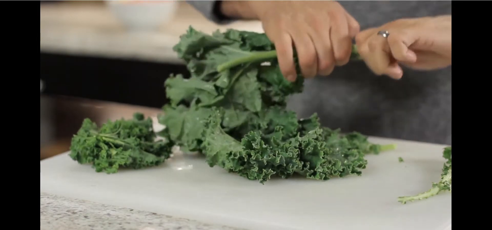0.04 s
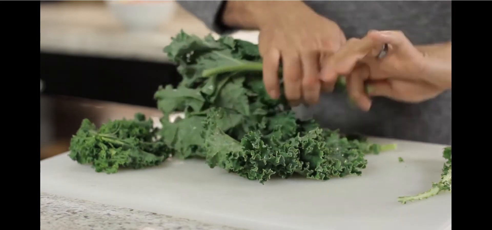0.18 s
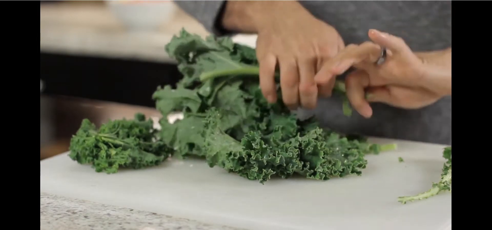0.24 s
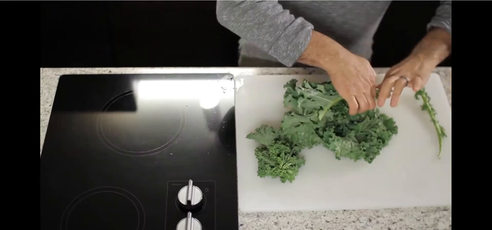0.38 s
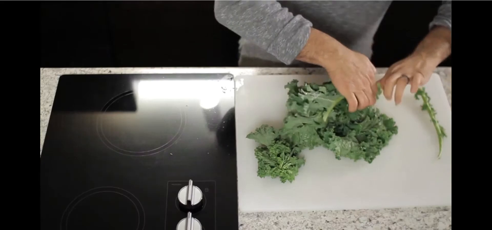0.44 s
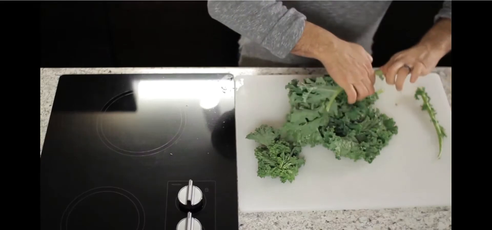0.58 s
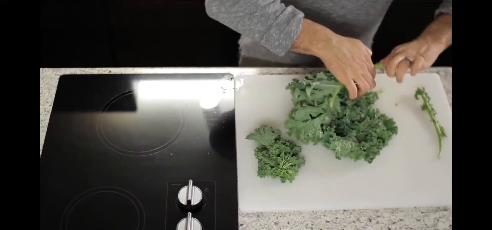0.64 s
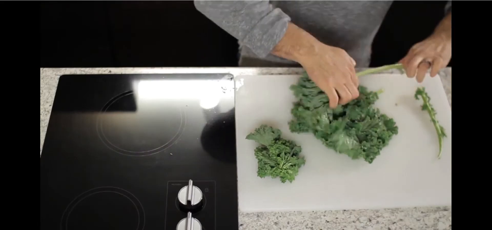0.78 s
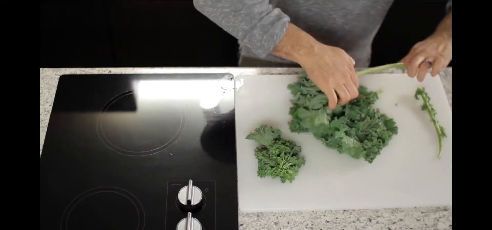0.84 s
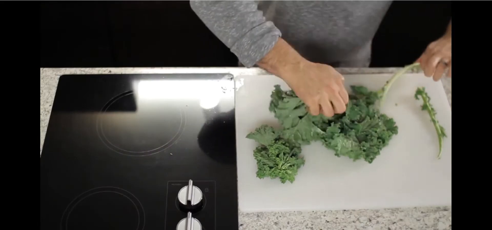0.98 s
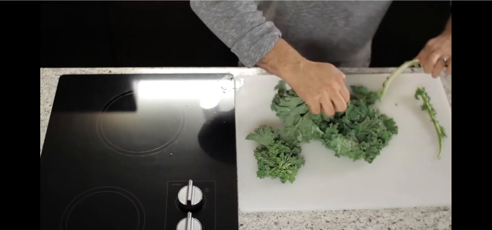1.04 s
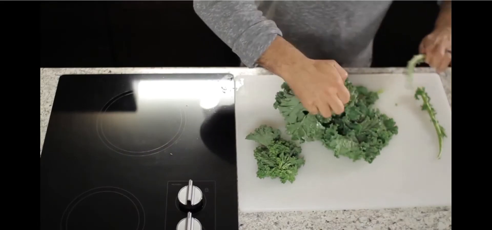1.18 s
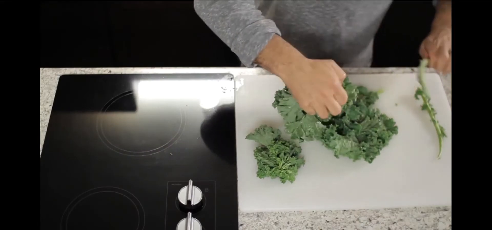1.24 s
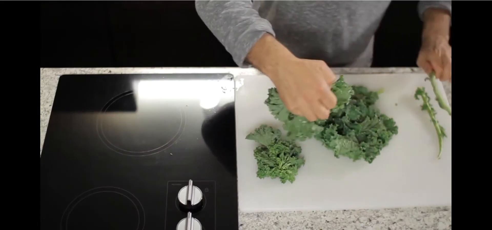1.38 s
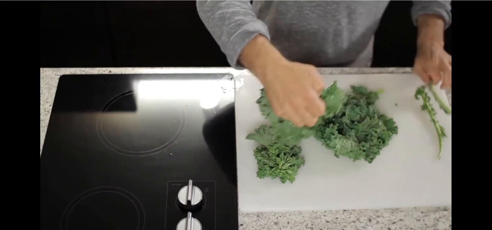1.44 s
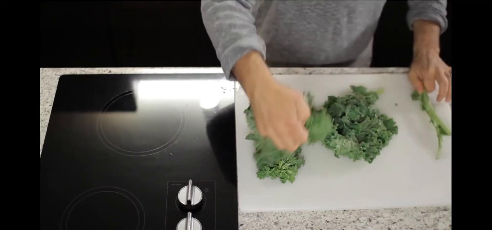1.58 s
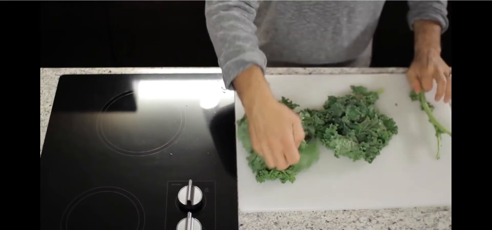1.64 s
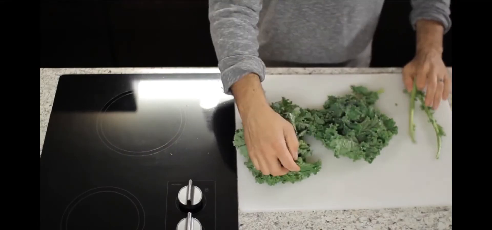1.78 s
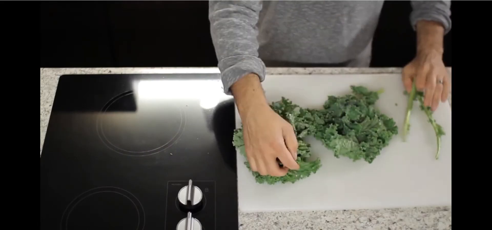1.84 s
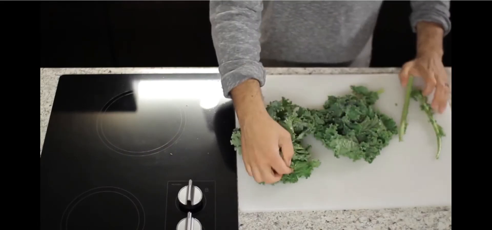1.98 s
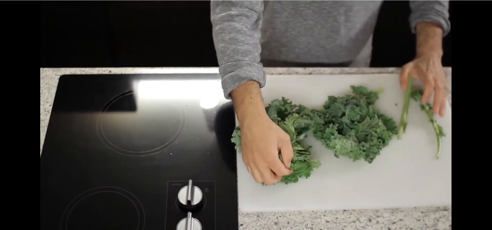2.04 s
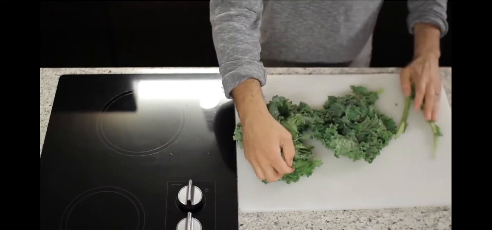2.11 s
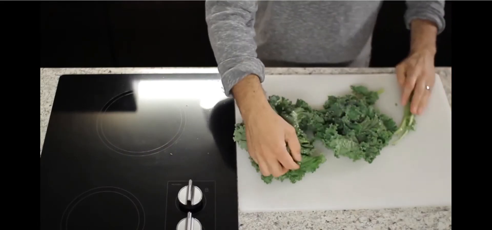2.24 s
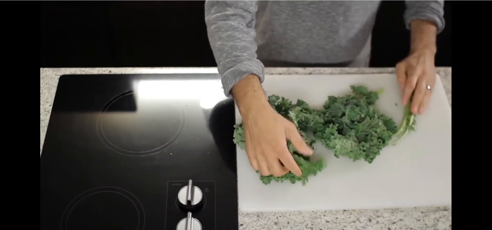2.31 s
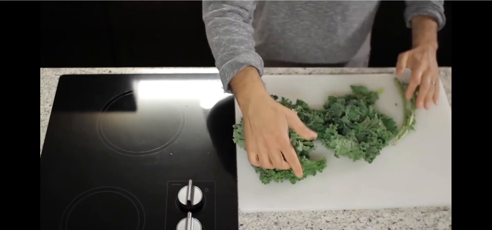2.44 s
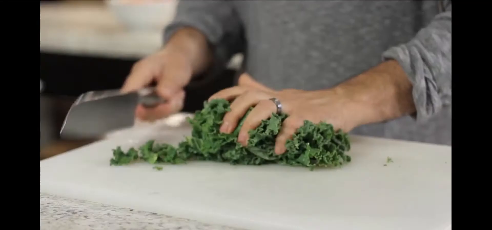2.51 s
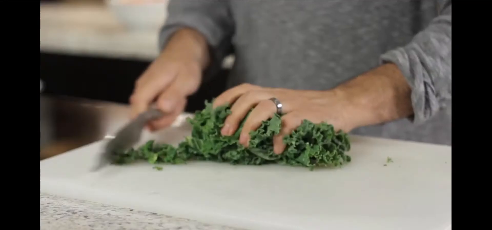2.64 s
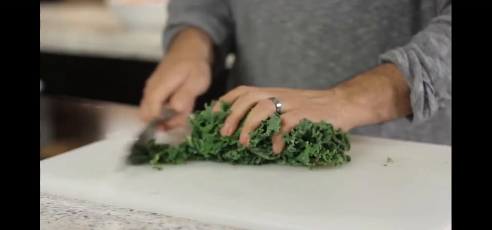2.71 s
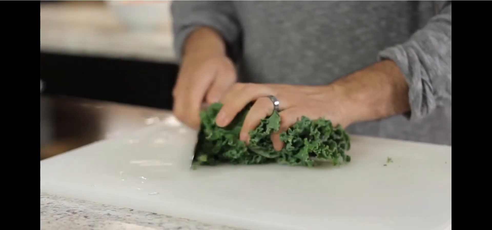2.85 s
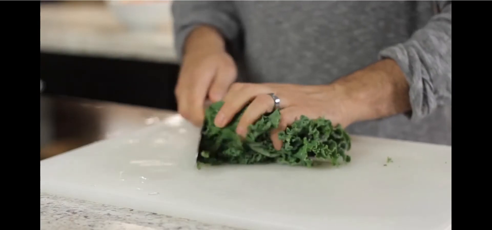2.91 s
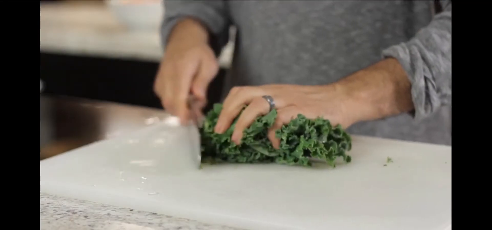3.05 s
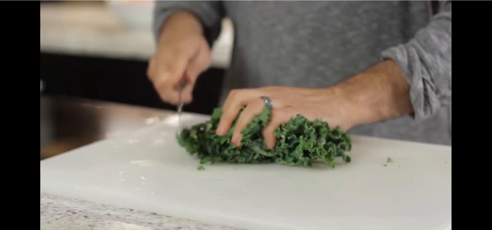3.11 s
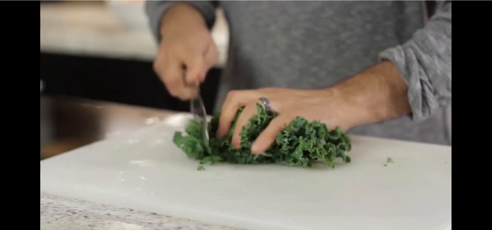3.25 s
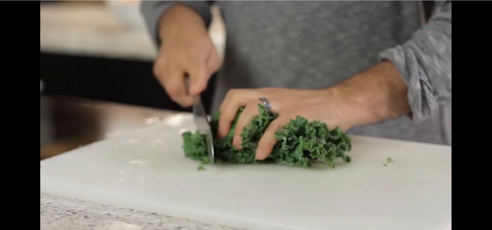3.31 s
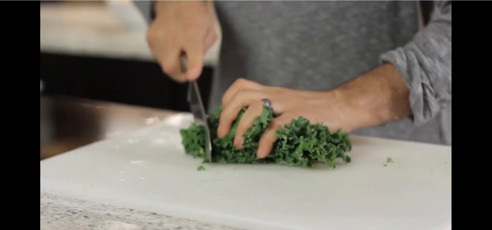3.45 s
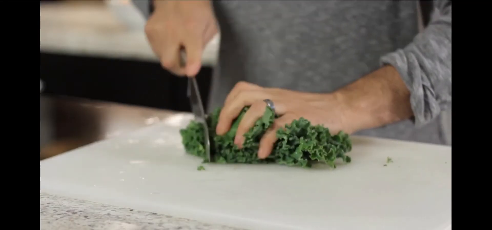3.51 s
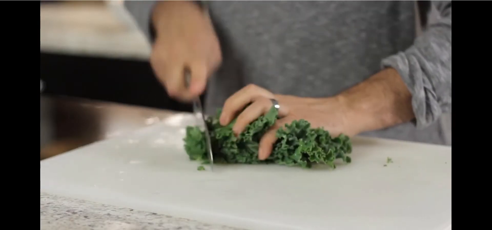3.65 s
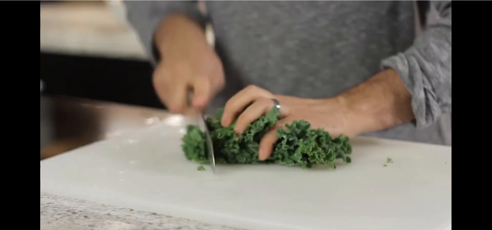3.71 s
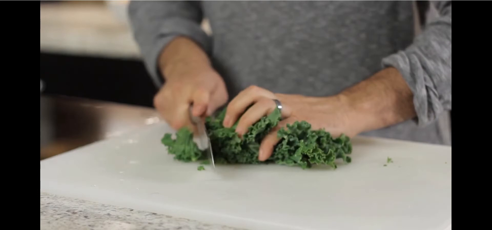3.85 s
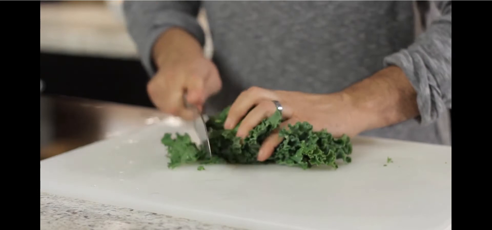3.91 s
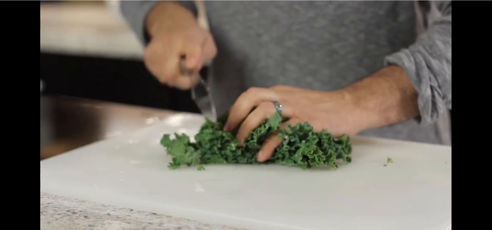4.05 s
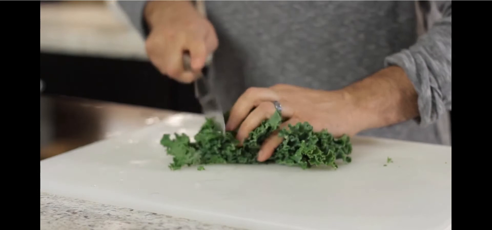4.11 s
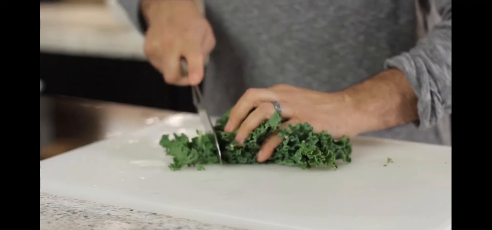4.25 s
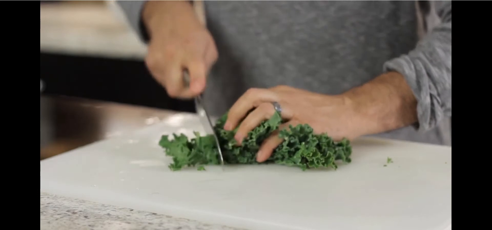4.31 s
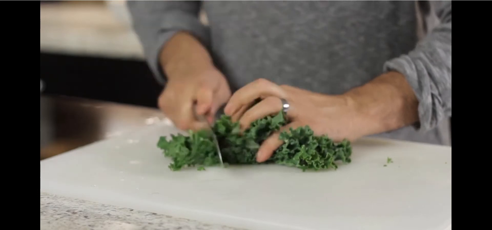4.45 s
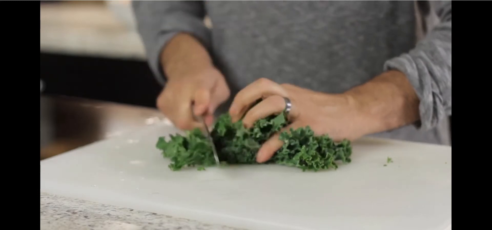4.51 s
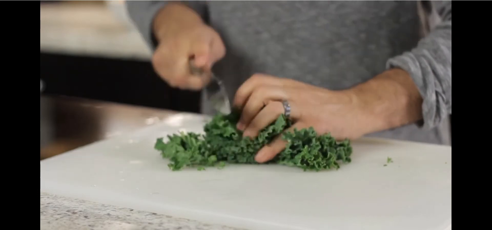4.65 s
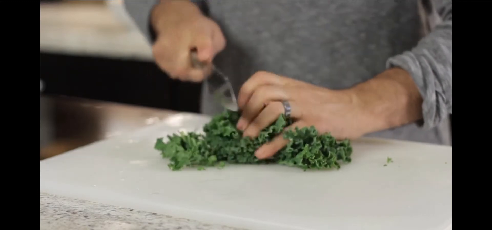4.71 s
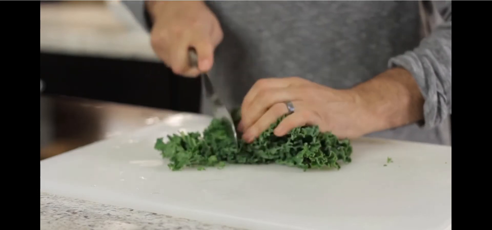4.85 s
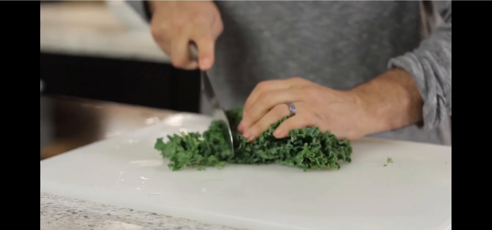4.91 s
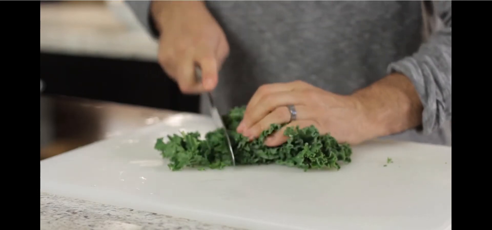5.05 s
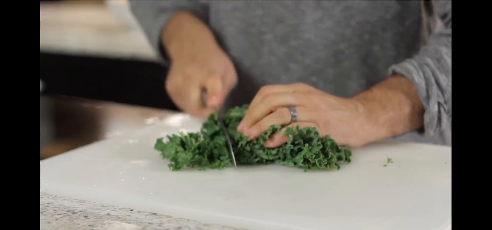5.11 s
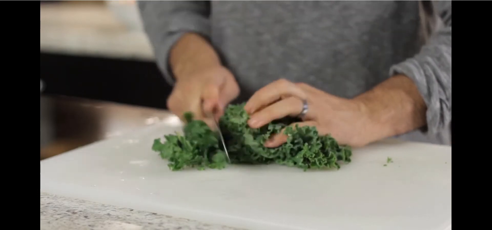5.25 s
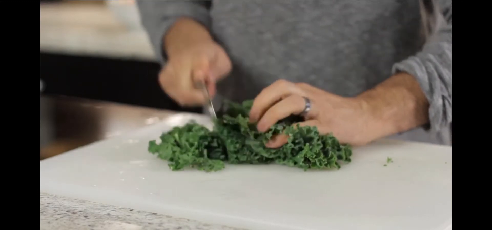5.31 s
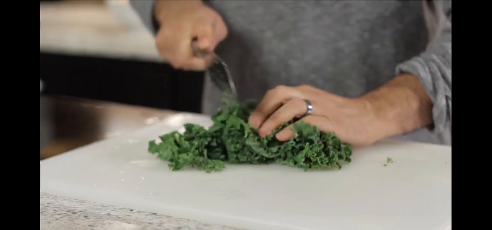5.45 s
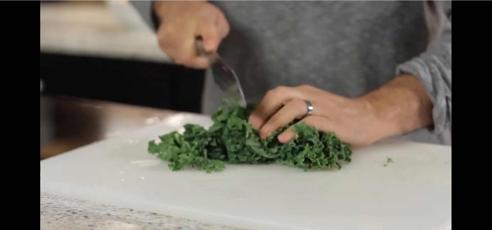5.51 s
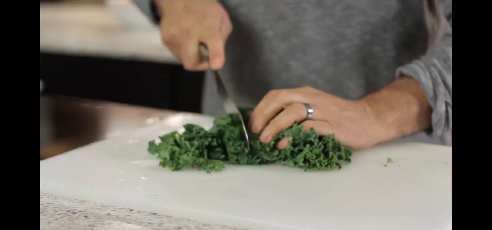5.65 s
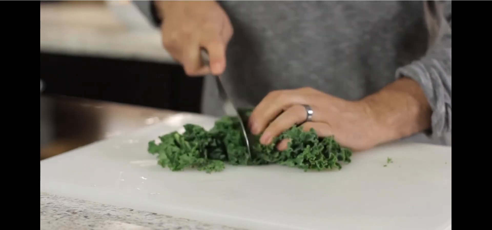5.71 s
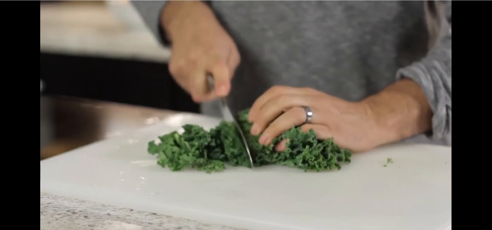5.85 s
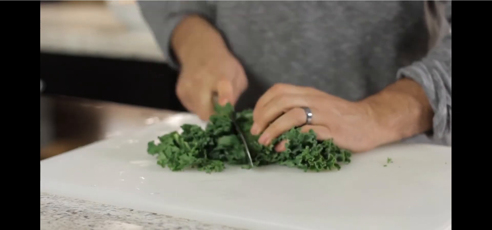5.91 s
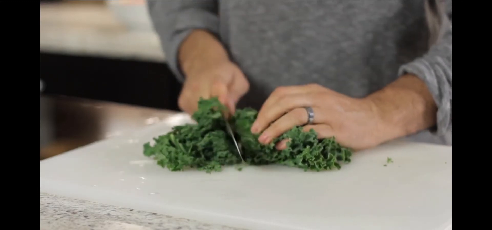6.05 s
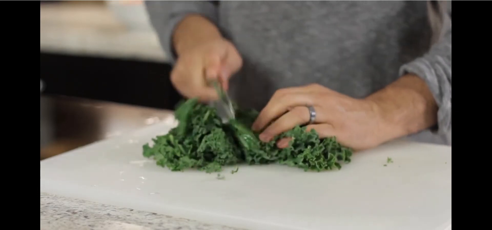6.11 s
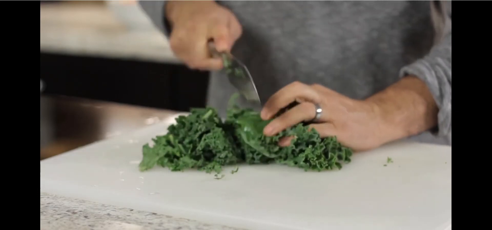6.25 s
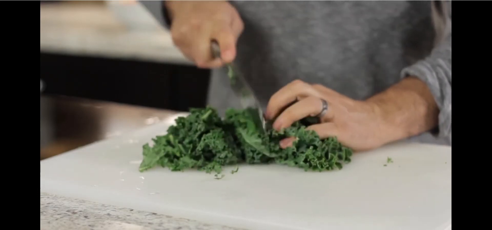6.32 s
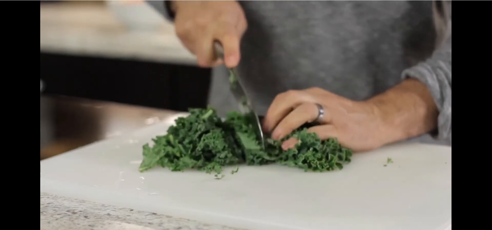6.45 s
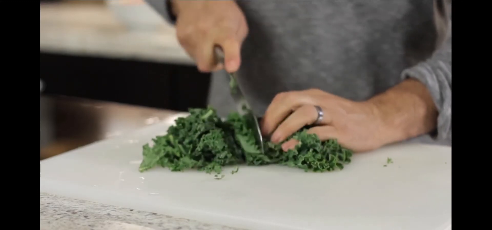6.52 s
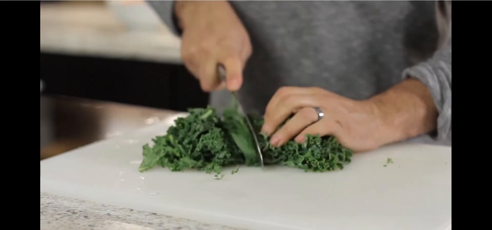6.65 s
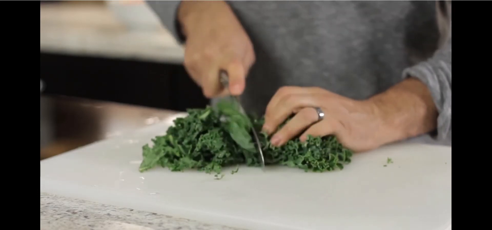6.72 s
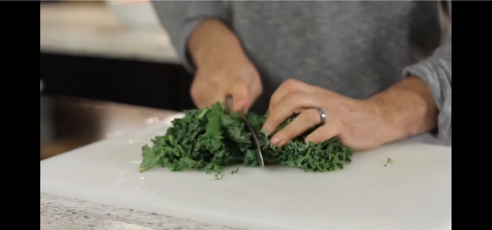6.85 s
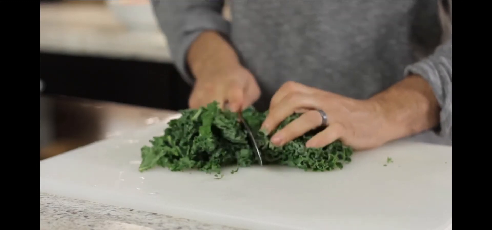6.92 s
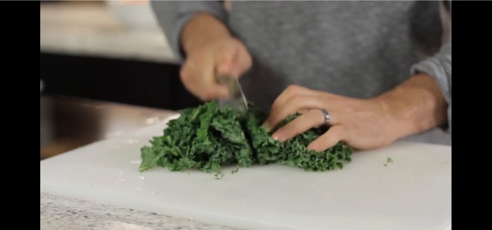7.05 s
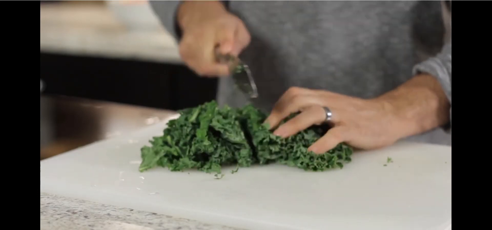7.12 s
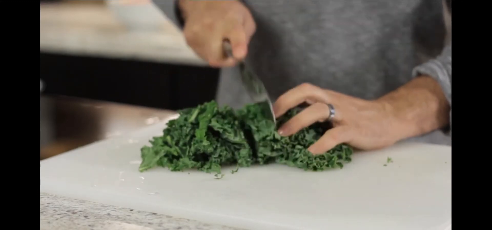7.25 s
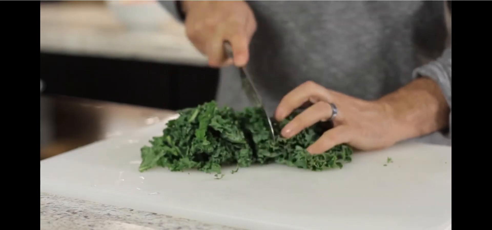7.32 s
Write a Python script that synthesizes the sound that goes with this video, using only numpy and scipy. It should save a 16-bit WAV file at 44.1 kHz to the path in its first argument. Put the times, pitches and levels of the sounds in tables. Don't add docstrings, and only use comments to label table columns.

```python
import sys
import numpy as np
from scipy import signal
from scipy.fft import irfft
from scipy.io import wavfile
from scipy.ndimage import uniform_filter1d

SR = 44100
rng = np.random.default_rng(int(sys.argv[2]) if len(sys.argv) > 2 else 0)


def inscribe(sig):
    pcm = np.round(np.clip(np.atleast_2d(sig).T, -1, 1) * 32767)
    wavfile.write(sys.argv[1], SR, pcm.astype(np.int16))


def gain_from_db(level_db):
    decades = np.asarray(level_db, float) / 20
    return 10 ** decades


N = 325458
T = np.arange(N) / SR

# hz, level_db_per_hz
LEAF_SPECTRUM = [(350, -4), (600, -17), (1180, -20), (2150, -9.5), (2470, -6.5), (3160, -4), (3680, 0),
                 (4780, -5), (8270, -10), (15100, -20), (16000, -24)]
# time_s, level_db, treble_db
HAND_GRIP = [(0, -57, 2), (1.3, -56, 1), (1.93, -54, 5), (2.6, -53, 0), (2.95, -42, -10), (3.3, -47, -6),
             (3.55, -39.5, -8), (4.04, -38, -9), (4.18, -50, -9), (4.35, -44, -5), (4.75, -42, -8),
             (5.33, -39, -12), (5.58, -48, -10), (6.1, -41, -8), (6.35, -37.5, -9), (7.0, -41, -9),
             (7.15, -49, -2), (7.38, -50, -2)]
# peak_s, level_db, rise_s_per_20db, fall_s_per_20db, treble_db
STRIPPING_STROKES = [(0.0, -41, .1, .07, 0), (0.115, -41, .06, .04, -10), (0.225, -41.5, .06, .08, -8),
                     (0.36, -34.5, .07, .07, -11.5), (0.51, -38, .02, .02, -6), (0.612, -31, .02, .13, 4),
                     (0.766, -33, .03, .03, 2), (0.784, -23, .008, .1, 1), (0.824, -16, .06, .1, 3),
                     (0.872, -19, .12, .05, 3), (0.96, -44, .1, .2, 7), (1.07, -36, .2, .23, -10),
                     (1.65, -48, .1, .1, 0), (1.81, -32.5, .25, .14, -9), (2.14, -38.5, .2, .4, -7),
                     (2.4, -40, .07, .4, -12), (2.63, -42, .15, .03, -5)]
# peak_s, level_db, rise_s_per_20db, fall_s_per_20db, treble_db
GATHERING_SWEEPS = [
    (2.649, -15, .004, .08, -26),
    (2.71, -27, .1, .4, -18),
    (2.94, -37, .3, .25, -9),
]
# peak_s, level_db, rise_s_per_20db, fall_s_per_20db, treble_db
CUTTING_STROKES = [(3.23, -32, .4, .07, -3), (3.36, -32, .065, .3, -2.5), (3.46, -27, .06, .08, -.5),
                   (3.76, -29.5, .17, .13, -2), (4.225, -27, .025, .07, 0), (4.48, -27.5, .2, .08, 3),
                   (4.68, -33, .15, .2, -5), (4.83, -33, .09, .04, -1), (4.92, -28, .08, .085, .5),
                   (5.0, -35, .02, .2, -3), (5.095, -18, .05, .12, -3), (5.19, -22, .25, .13, -3),
                   (5.45, -36, .2, .2, -6), (5.64, -25, .025, .04, -3), (5.783, -22, .012, .2, -6.5),
                   (5.755, -31, .03, .06, -6), (5.85, -19, .11, .17, -3), (5.98, -21.5, .4, .09, -7.5),
                   (6.425, -27, .04, .08, -4), (6.53, -30, .045, .25, 4), (6.63, -27, .06, .1, -4),
                   (6.725, -17.5, .15, .12, -5), (6.83, -23.5, .15, .15, -7), (6.905, -24, .15, .065, -1),
                   (7.25, -37.5, .16, .12, -8), (7.35, -28, .025, .06, -3)]
# start_s, peak_db, treble_db
STEM_TEARS = [(0.1216, -26, -3), (0.222, -25, -8), (0.4163, -25, -8), (0.4362, -21, 0), (0.5803, -12, 2.5),
              (0.602, -6, -4), (0.6469, -6, -.5), (0.7504, -14, 5), (0.7808, 1, -2), (0.9505, -24, 14),
              (0.9767, -17, 4), (0.985, -22, 10), (1.1385, -12, -2), (1.5327, -26, -10), (1.657, -20, 15),
              (2.6478, 2, -22), (2.7496, -7, -17), (2.8803, -6, -17)]
# start_s, peak_db, treble_db
RIB_BREAKS = [(3.048, -13, 0), (3.3484, -5, -2), (3.4558, 0, -6), (3.7284, -13, -5), (4.0363, -4, -6),
              (4.2215, -3, -3), (4.6185, -1, -.5), (4.797, -6, -2), (4.8945, -7, -4), (4.9064, -1, -2),
              (4.9452, -4, -2), (5.001, -5, 0), (5.0612, -9, -14), (5.087, -3, -10), (5.6365, 1, 0),
              (5.641, -4, 0), (5.6445, -7, 0), (5.6775, -8, -.5), (5.7322, 1, -5), (5.754, -5, -10),
              (5.778, -7, -20), (5.8421, 3, -6.5), (5.9286, -1, -12), (6.1943, -5, -6), (6.2236, -14, -1),
              (6.3905, -13, -4.5), (6.42, -6.5, -3), (6.5282, 0, 1), (6.6456, -1, 0), (6.666, 0, -7),
              (6.8995, 1, 0), (7.3458, -8, -6)]
# start_s, peak_db
LEAF_CRACKS = [(3.069, -16), (3.6275, -16), (3.759, -12), (3.8672, -18), (4.232, -10), (4.49, -5),
               (4.8215, -12), (4.9164, -3), (5.168, -3), (5.1815, -1), (5.2055, -5), (5.623, -13),
               (5.7875, -3), (5.9405, -1), (5.962, -3), (5.9925, -2), (6.161, -18), (6.2957, -16),
               (6.5405, -7), (6.564, -6), (6.618, -8), (6.8272, -2), (6.873, 0), (6.909, -2), (7.2495, -17),
               (7.3768, -10),
               (0.6096, -9), (0.8111, -4), (0.8453, -2), (0.859, -1), (1.1425, -18), (3.3964, -14),
                  (3.4708, -9), (3.492, -11), (3.5661, -17), (3.6558, -17), (3.9339, -17), (4.4493, -10),
                  (4.4732, -6), (4.5003, -10), (4.6256, -11), (4.9105, -6), (4.9283, -7), (5.0722, -8),
                  (5.0807, -5), (5.091, -1), (5.0971, 0), (5.1252, -3), (5.1426, -3), (5.1469, -5),
                  (5.1577, -7), (5.1751, -4), (5.2161, -7), (5.7392, -10), (5.7612, -9), (5.8008, -6),
                  (5.8133, -6), (5.8265, -4), (5.8449, -2), (5.8736, -3), (5.9324, -4), (5.9449, -4),
                  (5.9498, -2), (5.9805, -4), (5.9868, -4), (6.0002, -5), (6.2105, -19), (6.5353, -9),
                  (6.579, -9), (6.6124, -11), (6.6346, -10), (6.68, -5), (6.7103, -4), (6.7164, -1),
                  (6.729, -2), (6.735, -3), (6.7851, -9), (6.803, -6), (6.8079, -7), (6.815, -8),
                  (6.8349, -5), (6.8438, -6), (6.8569, -6), (6.8797, -6), (6.9026, -6), (6.9155, -6)]
# start_s, peak_db, dent_pitch_hz, upper_modes_db
BOARD_KNOCKS = [(2.255, -38, 229, -20), (2.65, -2, 223, -14.5), (2.783, -22, 169, -7),
                (3.473, -16, 231, -17.5), (3.842, -25, 274, -8.5), (4.223, -38, 307, 1),
                (4.296, -20, 240, -13), (4.51, -27.5, 280, -15), (4.538, -27, 186, -20),
                (5.0995, -10, 236, -4), (5.147, -25, 199, 0), (5.786, -15.5, 244, -15),
                (5.859, -11.5, 223, -12), (6.649, -16.5, 240, -31), (6.685, -20, 250, -8),
                (6.7315, -7, 234, -1), (6.785, -24, 300, 0), (6.975, -34, 178, -18)]
# pitch_hz, level_db, t60_s
BOARD_MODES = [(144, -22, .12), (186, -2.5, 0.24), (231, 1, 0.13), (269, -6, 0.09), (337, 0.5, .08),
               (395, -5.5, 0.097), (472, -1.5, 0.05), (583, -20, 0.047), (820, -36, .05)]
# peak_s, level_db, rise_s_per_20db, fall_s_per_20db, pressed_pitch_hz
BOARD_PRESSES = [(0.85, -25, .12, .065, 315), (2.12, -46, .6, .7, 207), (2.67, -6, .015, .075, 232),
                 (2.8, -26, .1, .25, 188), (3.475, -24, .015, .11, 231), (3.7, -34, .05, .06, 300),
                 (3.76, -36, .07, .08, 470), (3.85, -28, .04, .13, 285), (4.23, -42, .05, .05, 283),
                 (4.31, -29, .02, .2, 262), (4.51, -30, .08, .06, 300), (4.56, -27.5, .06, .07, 192),
                 (5.1, -16, .05, .08, 260), (5.28, -28, .07, .1, 240), (5.79, -16, .02, .2, 227),
                 (5.88, -21, .1, .14, 195), (5.96, -26, .1, .1, 195), (6.1, -36, .06, .2, 186),
                 (6.39, -48, .15, .5, 273), (6.66, -15, .04, .11, 220), (6.75, -15, .08, .15, 205),
                 (7.38, -44, .2, .1, 239)]
# time_s, main_mode_db, other_modes_db, tip_modes_db
BLADE_SCRAPE = [
    [(2.67, -46, 2, 7), (2.71, -28, -1, 3), (2.779, -22, 3, 4), (2.79, -11.5, -7, 1), (2.855, -11, -9, -5),
     (2.868, -24, 4, -7), (2.884, -12.5, -5, -4), (2.916, -27, 0, 2), (2.97, -62, 0, 5)],
]
# pitch_hz, width_hz, level_db
BLADE_MODES = [(645, 45, -37), (1400, 29, -34), (2050, 30, -25), (2670, 30, -28), (3010, 30, -21),
               (3520, 40, -21), (3900, 28, 0), (4090, 25, -14), (4540, 26, -11), (4745, 45, -21),
               (5050, 85, -24), (5430, 34, -24), (6370, 45, -21), (7230, 54, -20), (7800, 28, -22),
               (8420, 38, -28), (8800, 44, -28), (9310, 94, -27), (9650, 27, -22), (10300, 56, -28),
               (11300, 35, -25), (11800, 110, -22), (12200, 29, -21), (12500, 31, -29), (12800, 29, -23),
               (13700, 28, -28)]
# start_s, pitch_hz, level_db, t60_s
EDGE_CRACK = (2.6494, 3350, -10, .025)
# hz, level_db_per_hz
KITCHEN_SPECTRUM = [(15, -53), (25, -31), (53, -23), (145, 1.5), (195, -2), (354, -3.5), (754, -21),
                    (1040, -31.5), (2350, -7), (2550, -14), (3520, -5.5), (9070, -29), (14800, -14),
                    (16000, -34)]

FIDGET_DB, FIDGET_PER_S = 1.8, 13
CRACK_TREBLE_DB = -7
SNAP_DECAY_S = .0012
BOUNCE_S, BOUNCE_DB = .0004, -5
TREBLE_LOSS_DB_PER_DB = .35
SAG_HZ_PER_DB = 1.2
REST_DB, REST_HZ = -57, 235
LOW_MODES_DB, LOW_MODES_DB_PER_OCTAVE = -19, -35
BLADE_ROOM_SHARE = .45
KITCHEN_DB = -49
ROOM_T60_S, ROOM_DB = .29, -13
ECHO_S, ECHO_DB = .0065, -11.5
TOP_HZ = 15900
CEILING = .62


def leaves():
    grip_db, grip_treble_db = curve(HAND_GRIP)
    grip_db = grip_db + FIDGET_DB * walk(FIDGET_PER_S)
    strokes = STRIPPING_STROKES + GATHERING_SWEEPS + CUTTING_STROKES
    crinkle_db, treble_db = swells(strokes, grip_db, grip_treble_db, TREBLE_LOSS_DB_PER_DB)
    treble_db = treble_db + 7.2

    small = [(s, db, CRACK_TREBLE_DB) for s, db in LEAF_CRACKS]
    snap_s, peak_db, snap_treble_db = np.transpose(STEM_TEARS + RIB_BREAKS + small)
    snap_treble_db = snap_treble_db + 6

    ticks, common = grains(rate=320, spread_db=3.3, decay_s=.00069)
    out = np.convolve(ticks * gain_from_db(crinkle_db - 12), click(0.))[128:N + 128]
    for at, db, bright_db in zip((snap_s * SR).astype(int), peak_db - 2.2, snap_treble_db):
        out[at - 72:at + 184] += gain_from_db(db) * click(bright_db)[:N - at + 72]

    centres_hz = 500 * 2 ** np.arange(0, 5.1, 1 / 3)
    patch_db = 2.8 * rng.standard_normal((len(snap_s), len(centres_hz)))
    tail = np.exp(-np.arange(1024) / SR / SNAP_DECAY_S)
    tail_at = ((snap_s + .0012) * SR).astype(int)
    for k, hz in enumerate(centres_hz):
        own = grains(rate=400, spread_db=2.5, decay_s=.0016)[1]
        drift_db = 1.5 * walk(14)
        texture = common + gain_from_db(-1) * own + gain_from_db(-.2)
        shape = gain_from_db(crinkle_db - 10 + reach(hz) * treble_db + drift_db) * texture
        low_cut_db = 3 * min(np.log2(hz / 2000), 0)
        tail_db = peak_db - 19.3 + low_cut_db + reach(hz) * snap_treble_db + patch_db[:, k]
        for at, db in zip(tail_at, tail_db):
            shape[at:at + len(tail)] += gain_from_db(db) * tail[:N - at]
        gain = gain_from_db(colour(LEAF_SPECTRUM, min(hz, 15000)) + 11.5)
        out = out + gain * band(shape * rng.standard_normal(N), hz, 1 / 3)
    return out


def board():
    push_db, pressed_hz = swells(BOARD_PRESSES, REST_DB, REST_HZ, SAG_HZ_PER_DB)
    unevenness = .9 + .5 * grains(rate=200, spread_db=1.5, decay_s=.004)[1]
    push = rng.standard_normal(N) * unevenness * gain_from_db(push_db - 36)

    knock_s, peak_db, dent_hz, upper_db = np.transpose(BOARD_KNOCKS)
    low_db = LOW_MODES_DB + LOW_MODES_DB_PER_OCTAVE * np.log2(dent_hz / REST_HZ)
    knock_at = (knock_s * SR).astype(int)
    spot_db = rng.standard_normal((len(knock_s), len(BOARD_MODES)))
    contact = np.sin(np.pi * np.arange(0, 1, 1 / (.00085 * SR)))
    contact = contact / contact.sum()

    out = np.zeros(N)
    for k, (hz, db, t60_s) in enumerate(BOARD_MODES):
        place_db = 0
        if hz > 290:
            place_db = upper_db + 6.5
        elif hz < 205:
            place_db = low_db + 3.5
        blows = np.zeros(N)
        np.add.at(blows, knock_at, gain_from_db(peak_db - 10.5 + place_db + spot_db[:, k]))
        octaves_off = np.minimum(np.abs(np.log2(hz / pressed_hz)), .8)
        rub = push * gain_from_db(-18 * octaves_off)
        out += gain_from_db(db) * ring(np.convolve(blows, contact)[:N] + rub, hz, t60_s)

    t = T[:4096]
    dent_envelope = np.exp(-t / .017) * np.clip(t / .0018, 0, 1)
    sagging_s = t + .16 * .02 * (1 - np.exp(-t / .024))
    for at, db, hz in zip(knock_at, peak_db, dent_hz):
        out[at:at + len(t)] += gain_from_db(db - 9) * np.sin(2 * np.pi * hz * sagging_s) * dent_envelope
    return signal.sosfilt(signal.butter(4, 130, "high", fs=SR, output="sos"), out)


def blade():
    on = (T > BLADE_SCRAPE[0][0][0]) & (T < BLADE_SCRAPE[-1][-1][0])
    main_db, others_db, tip_db = (c[on] for c in curve(BLADE_SCRAPE))
    loudest = np.argmax(np.array(BLADE_MODES)[:, 2])

    slip = .55 + grains(rate=2000, spread_db=3, decay_s=.00087)[1]
    chatter = (rng.standard_normal(N) * slip)[on]
    hiss = level(band(chatter, 8900, 1.6), -5)
    hiss = hiss + level(band(chatter, 4200, 1.66), -6)
    hiss = hiss + level(band(chatter, 1570, 2.8), -12.5)
    steel = hiss * gain_from_db(main_db + others_db + 1.5)

    for k, (hz, width_hz, db) in enumerate(BLADE_MODES):
        wander_rad = (1.3 if k == loudest else 2.2) * walk(1.5 * width_hz)[on]
        mode = np.sin(2 * np.pi * hz * T[on] + wander_rad)
        if k == loudest:
            drive_db = main_db + 1.5 * walk(90)[on]
        else:
            tilt_db = 5.5 - 1.7 * np.log2(hz / 4000)
            drive_db = main_db + others_db + tilt_db + 4 * walk(45)[on]
        if hz < 1000:
            drive_db = drive_db - tip_db
        elif hz < 3100:
            drive_db = drive_db + tip_db
        steel = steel + level(mode, db + 10 * np.log10(width_hz / 28)) * gain_from_db(drive_db)

    out = np.zeros(N)
    out[on] = steel
    out *= uniform_filter1d(1. * on, 400)
    start_s, hz, db, t60_s = EDGE_CRACK
    out[int(start_s * SR):][:4096] += ring(gain_from_db(db) * (T[:4096] == 0), hz, t60_s)
    return out


def room(x):
    t = T[:int(.5 * SR)]
    envelope = np.exp(-np.log(1000) * t / ROOM_T60_S) * np.clip(t / .018, 0, 1)
    tail = signal.lfilter([1], [1, -.3], rng.standard_normal(len(t)) * envelope)
    tail = gain_from_db(ROOM_DB) * tail / np.sqrt(np.sum(tail ** 2))
    tail[int(ECHO_S * SR)] += gain_from_db(ECHO_DB)
    return x + signal.fftconvolve(x, tail)[:N]


def rumble(near):
    shake = gain_from_db(-74 + 2.7 * walk(4)) + gain_from_db(-13.5) * uniform_filter1d(near ** 2, 500)
    return level(band(rng.standard_normal(N), 35, 2.5), 0) * shake


def kitchen():
    out = np.zeros(N)
    for hz in 30 * 2 ** np.arange(0, 9.1, .5):
        flicker_db = 1.74 * walk(3.8)
        gain = gain_from_db(colour(KITCHEN_SPECTRUM, min(hz, 15000)) + flicker_db)
        out += gain * band(rng.standard_normal(N), hz, .5)
    return level(out, KITCHEN_DB)


def swells(rows, rest_db, rest_value, sag_per_db):
    t = T[::64]
    peak_s, db, rise_s, fall_s, value = np.transpose(rows)[:, :, None]
    faded_db = 20 * np.maximum(t - peak_s, 0) / fall_s
    rising_db = 20 * np.maximum(peak_s - t, 0) / rise_s
    power = gain_from_db(2 * (db - faded_db - rising_db))
    rest = gain_from_db(2 * (rest_db + 0 * T))[::64]
    rest_value = (rest_value + 0 * T)[::64]
    total = power.sum(axis=0) + rest
    weighted = (power * (value - sag_per_db * faded_db)).sum(axis=0) + rest * rest_value
    return np.interp(T, t, 10 * np.log10(total)), np.interp(T, t, weighted / total)


def grains(rate, spread_db, decay_s):
    chance = rng.random((2, N))
    size = np.minimum(-np.log(1 - chance[1]), 4.5)
    starts = (chance[0] < rate / SR) * gain_from_db(spread_db * size)
    tails = signal.lfilter([1], [1, -np.exp(-1 / (decay_s * SR))], starts)
    scale = np.sqrt(np.mean(tails ** 2))
    return starts / scale, tails / scale


def click(treble_db):
    hz = np.linspace(1, SR / 2, 129)
    spectrum_db = colour(LEAF_SPECTRUM, np.minimum(hz, 15000)) + reach(hz) * treble_db
    shape = np.roll(irfft(gain_from_db(spectrum_db) * np.minimum(hz / 900, 1) ** 2), 128)
    bounce = gain_from_db(BOUNCE_DB) * np.roll(shape, int(BOUNCE_S * SR))
    return -(shape + bounce) / shape.max()


def reach(hz):
    return np.clip(np.log(hz / 3200) / np.log(3.2), 0, 1.2)


def ring(x, hz, t60_s):
    pole = np.exp(2j * np.pi * hz / SR - np.log(1000) / (t60_s * SR))
    return signal.lfilter([1], [1, -pole], x).imag


def walk(rate):
    k = int(SR / rate)
    steps = np.repeat(rng.standard_normal(N // k + 1), k)
    return 1.3 * uniform_filter1d(uniform_filter1d(steps, k), k)[:N]


def band(x, hz, octaves):
    edges_hz = hz * 2. ** (np.array([-.5, .5]) * octaves)
    edges_hz = np.minimum(edges_hz, .49 * SR)
    return signal.sosfilt(signal.butter(2, edges_hz, "band", fs=SR, output="sos"), x)


def colour(points, hz):
    f, db = np.transpose(points)
    return np.interp(np.log(hz), np.log(f), db)


def curve(table):
    s, *columns = np.transpose(np.vstack(table))
    return [np.interp(T, s, c) for c in columns]


def level(x, db):
    return x * gain_from_db(db) / np.sqrt(np.mean(x ** 2))


def scene():
    steel = blade()
    near = room(leaves() + BLADE_ROOM_SHARE * steel)
    near = near + (1 - BLADE_ROOM_SHARE) * steel + board()
    return (near + rumble(near) + kitchen())[None]


def band_limit(x):
    return signal.sosfilt(signal.butter(12, 16990, fs=SR, output="sos"), x)


def record(dry):
    limited = dry / (1 + np.abs(dry / CEILING) ** 4) ** .25
    top_cut = signal.ellip(10, .2, 45, TOP_HZ, fs=SR, output="sos")
    return band_limit(signal.sosfilt(top_cut, limited))


dry = scene()
out = record(dry)
inscribe(out)
```